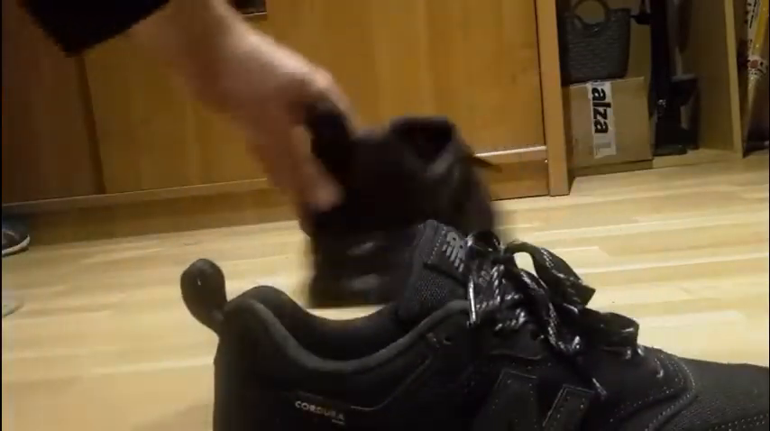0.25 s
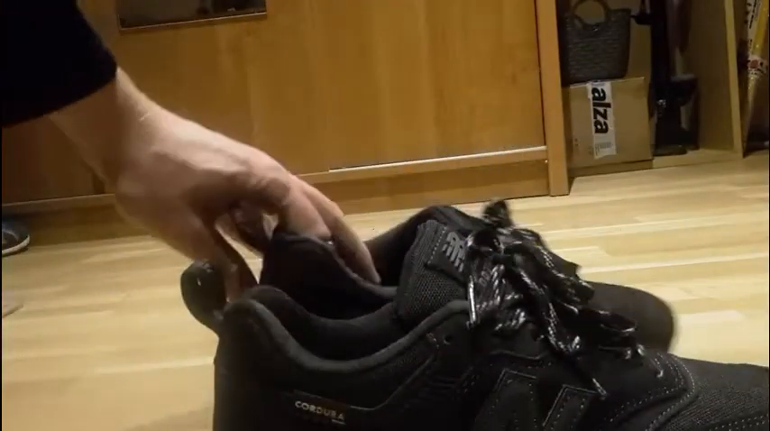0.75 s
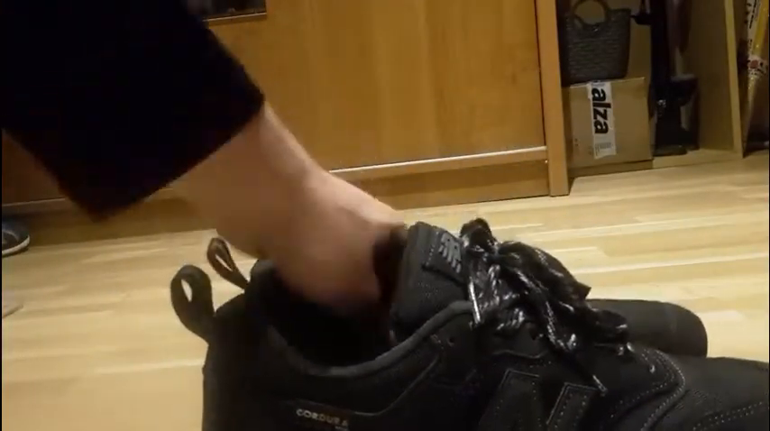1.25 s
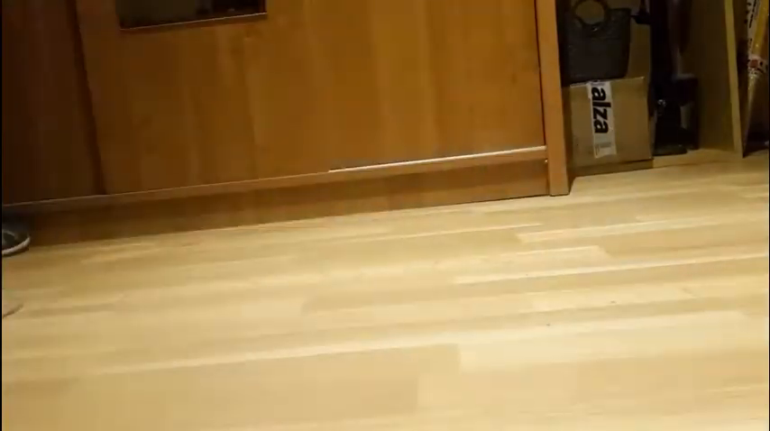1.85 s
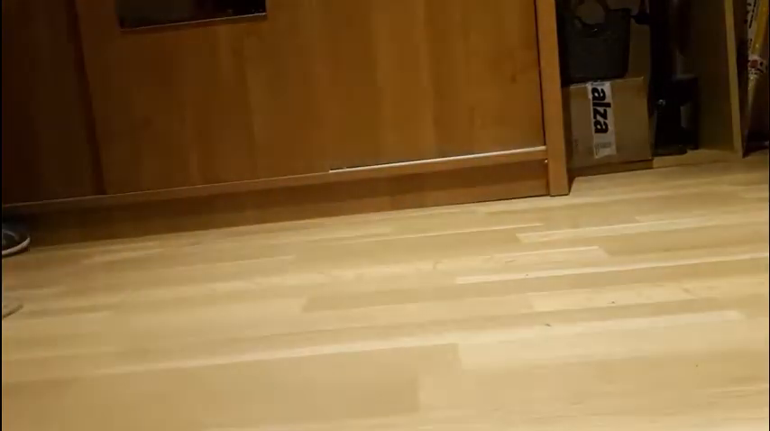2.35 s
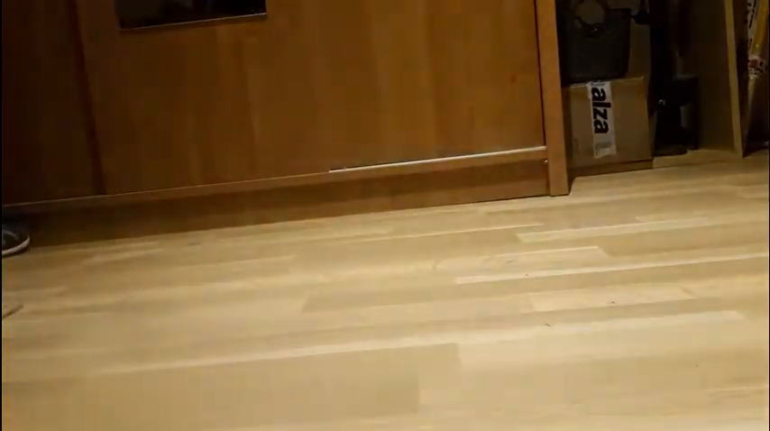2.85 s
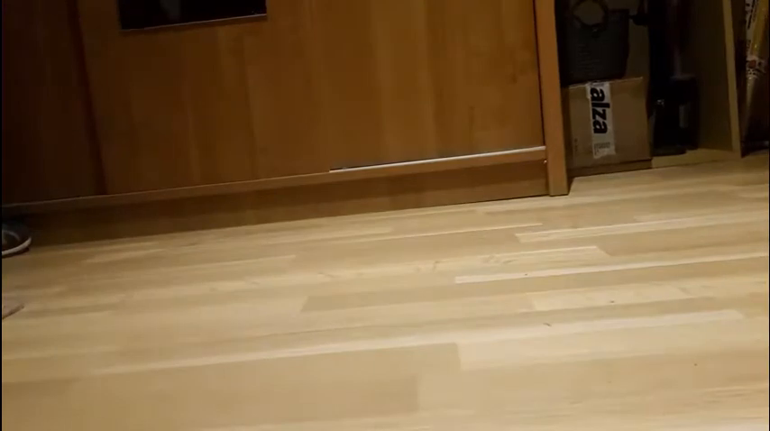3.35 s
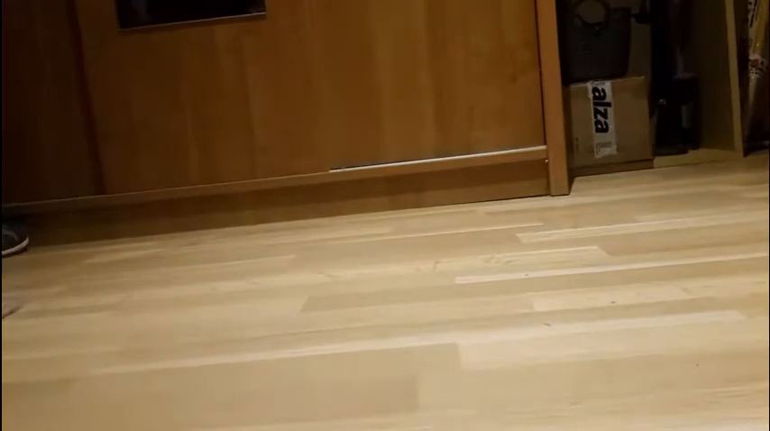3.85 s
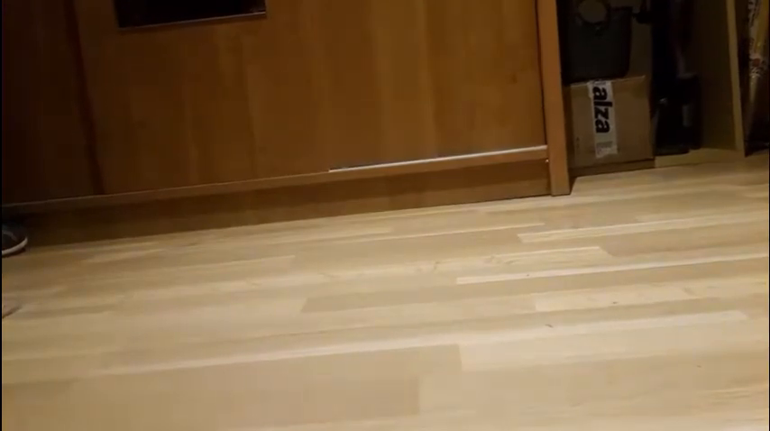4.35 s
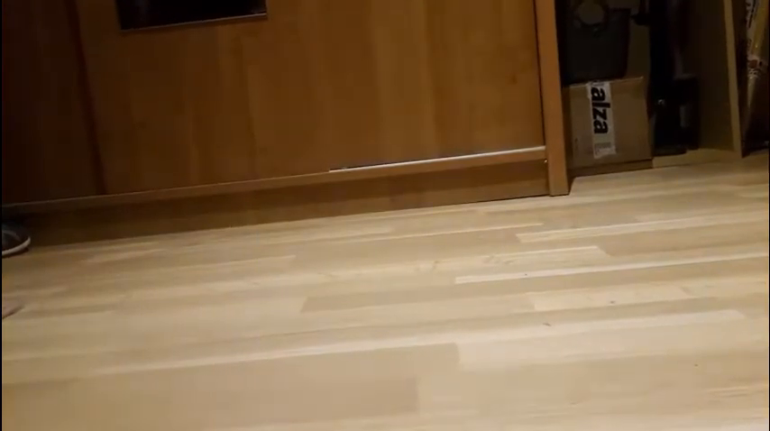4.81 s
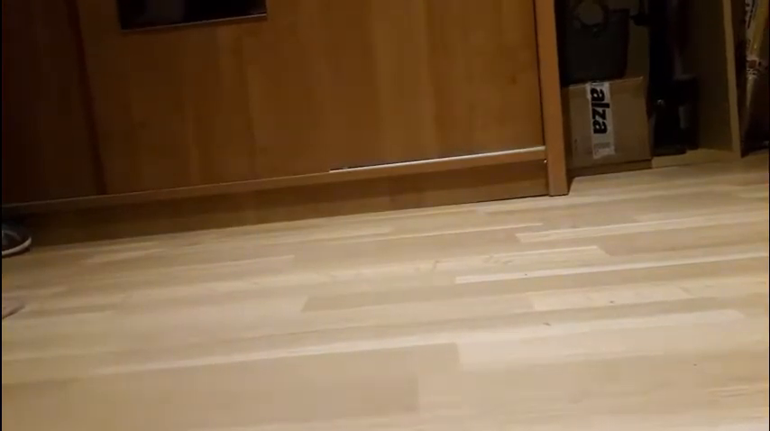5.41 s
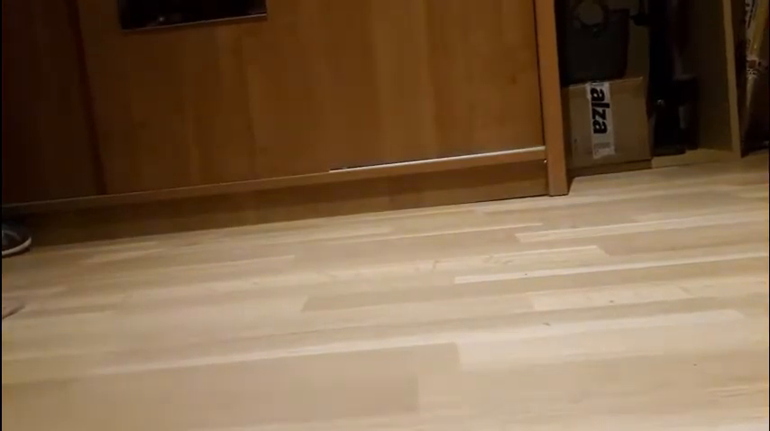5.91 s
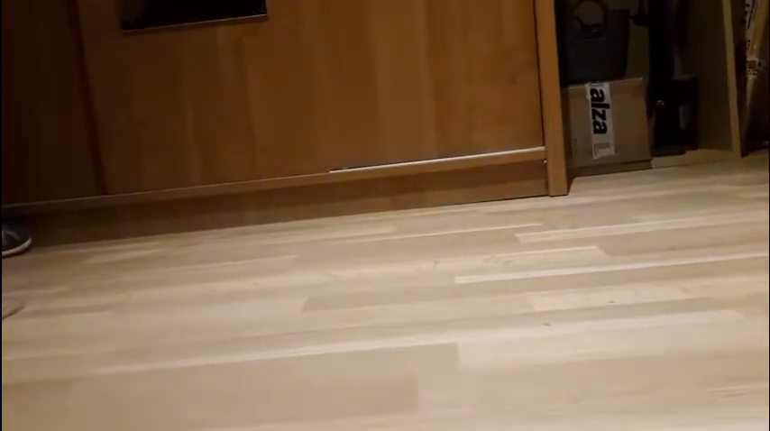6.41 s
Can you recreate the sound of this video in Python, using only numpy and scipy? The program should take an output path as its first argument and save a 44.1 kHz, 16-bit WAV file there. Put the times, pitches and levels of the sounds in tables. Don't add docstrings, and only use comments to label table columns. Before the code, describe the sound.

Close dull shoe thumps on floorboards, a rustling pick-up, then a sharp hollow drop beside a wooden cabinet, fading into small scuffs and hiss.

```python
import sys
import numpy as np
from scipy import signal
from scipy.io import wavfile
from scipy.ndimage import uniform_filter1d

SR = 44100
rng = np.random.default_rng(int(sys.argv[2]) if len(sys.argv) > 2 else 0)


def volts_from_decibels(level):
    exponent = np.asarray(level, float) / 20
    return 10 ** exponent


def dump(signal):
    limited = np.clip(np.atleast_2d(signal).T, -1, 1)
    pcm = np.round(limited * 32767).astype(np.int16)
    wavfile.write(sys.argv[1], SR, pcm)


N = 294191

# t/s, peak
# level/dB, f/Hz, length/cycles, hardness/dB
NEAR_CONTACTS = [(.104, -54, 560, 1.3, -8), (.218, -50.5, 513, 0.71, -7), (.232, -49, 530, 0.77, -12),
                 (.434, -47, 240, 0.5, -20), (.5924, -17.5, 485, 0.47, -2.5), (.657, -27, 470, 0.49, -25),
                 (.755, -42, 368, 0.67, -19), (.900, -51.5, 503, 2.2, -20), (.963, -40.5, 334, 0.22, -21),
                 (1.059, -39.5, 494, 1.8, 9), (1.0732, -20.5, 318, 0.68, -20),
                 (1.0936, -13.5, 498, 1.54, -22), (1.0932, -15.5, 935, 1.57, 1.5),
                 (1.2033, -16, 494, 0.92, -4), (1.252, -32, 460, 0.8, -18), (1.281, -37, 300, 1, -24),
                 (1.31, -45, 296, 0.41, -15), (1.419, -52, 229, 0.48, -15), (1.522, -43, 497, 0.6, -12),
                 (1.595, -47, 486, 0.7, -14), (1.704, -45, 620, 1.04, 5.5), (1.961, -40, 970, 0.61, -38),
                 (2.027, -48.5, 417, 1.2, -8), (1.113, -29, 685, 2.6, -15), (.6395, -36, 806, .6, -15),
                 (.609, -33, 420, 1.1, -17), (.673, -38.5, 410, 1.2, -15), (1.107, -29, 492, 1.1, -20),
                 (1.138, -44, 710, 1.2, -15), (1.119, -37, 950, 1.6, -15), (1.097, -31, 980, 1.3, -11),
                 (1.109, -44, 1000, 0.96, -15), (.62, -44, 890, 1.1, -15), (1.131, -39, 420, 1, -15),
                 (1.148, -34, 400, 1.7, -15), (1.161, -47, 513, 1.3, -15), (1.217, -34, 480, 0.93, -18),
                 (1.243, -35, 300, 1.5, -15),
                 (1.465, -53, 673, 3, -20), (1.485, -50, 676, 3, -20), (1.922, -54, 580, 1.2, -15),
              (1.226, -36, 272, 1.2, -20), (.618, -40, 700, 2.5, -20), (.595, -34, 950, 1.2, -20),
              (.605, -36, 600, 1.2, -20), (.648, -42, 430, 1.1, -20), (.69, -46, 600, 1.5, -20),
              (1.125, -34, 700, 1.5, -20), (1.112, -35, 277, 1.2, -20), (1.268, -38, 426, 1, -20),
              (1.232, -32, 480, 1.2, -20)]
CABINET_CONTACTS = [(2.8066, -4.5, 890, 0.41, -13), (2.8097, -15, 400, 1.27, 2.5),
                    (2.9136, -21.5, 600, 0.18, -2.5), (2.916, -22.5, 400, 0.79, -27),
                    (3.068, -40.5, 400, 1.2, -26), (3.579, -30, 414, 0.65, -2.5),
                    (3.800, -44, 314, 0.61, -17), (3.812, -48, 373, 2.2, -11),
                    (4.3317, -21.5, 710, 0.6, -15.5), (4.3345, -26.5, 560, 1.7, -30),
                    (4.366, -42, 870, 0.83, -10), (4.468, -46, 620, 1.3, -16),
                    (4.617, -34.5, 336, 0.72, -8), (4.634, -41, 380, 0.8, -22), (4.665, -49, 400, 0.6, -16),
                    (4.78, -50, 179, 0.38, -24), (5.494, -46, 402, 1.7, -11), (5.54, -46.5, 423, 0.56, -13),
                    (5.847, -45, 527, 0.35, -16), (5.94, -50, 600, 0.39, -8), (4.98, -51, 450, 0.81, 2),
                    (5.518, -45.5, 427, 0.56, -2), (2.8112, -13, 710, 1, -22), (4.331, -26, 1130, 1.5, -15),
                    (2.823, -28, 770, 1.2, -17), (2.855, -34, 770, 2, -17), (2.9195, -32, 467, 0.53, -21),
                    (2.829, -29, 300, .8, -17), (2.816, -31, 1500, 1.5, -20), (2.838, -26, 1210, 1.3, -20),
                    (2.928, -27, 900, 0.88, -17), (2.843, -31, 274, 1.7, -13), (3.585, -32, 600, 0.71, -18),
                    (4.3295, -44, 600, 0.68, -17), (4.359, -33, 900, 2, -15), (4.383, -38, 710, 2.2, -19),
                    (4.403, -48, 985, 0.91, -15), (4.397, -53, 707, 1.9, -12),
                    (4.321, -45, 700, 1.2, -22), (4.348, -40, 780, 1.8, -18), (4.352, -39, 1370, 1.4, -20),
                 (4.374, -42, 1000, .9, -20), (4.455, -47.5, 410, 1.3, -20), (4.338, -37, 1800, 1.2, -25),
                 (3.582, -44.5, 1110, 3.4, -20), (3.4, -53, 780, 5, -25), (3.878, -56, 790, 4.3, -25),
                 (3.772, -54, 800, 1.2, -20), (2.8092, -19.5, 1100, 1.2, -20), (2.876, -38, 1180, 4.4, -20),
                 (2.945, -42, 190, 1.6, -25), (2.8085, -18.5, 598, 1.9, -25), (2.818, -24, 284, 1.17, -25),
                 (2.862, -35, 540, 2.5, -25), (2.89, -44, 560, 2.5, -25), (2.93, -33, 560, 2, -25),
                 (2.914, -31, 950, 1.5, -25), (2.813, -17, 300, .6, -25), (4.39, -41, 673, 2.5, -22),
                 (4.41, -46, 680, 2.5, -22), (4.645, -46, 790, 1.8, -20)]
# t/s, peak level/dB, f/Hz, length/cycles
NEAR_THUDS = [
    (.596, -39.5, 104, 0.42),
    (1.1, -46, 55, 0.45),
    (1.1, -52, 33, .5),
    (1.098, -38, 133, 0.83),
    (1.208, -34, 146, 0.86),
]
CABINET_THUDS = [
    (2.812, -38, 59.6, 0.51),
    (2.815, -41, 36, .5),
    (3.07, -57, 45, .6),
    (5.5, -62, 70, 0.55),
    (2.811, -30.5, 134, 1.16),
    (3.083, -52.5, 82.4, 1.8),
    (3.581, -41, 86, 1.02),
    (4.621, -46.5, 80, 0.47),
]
# t/s, level/dB
NEAR_JOLTS = [
    (0.219, -49),
    (.963, -40.5),
    (2.028, -52),
]
CABINET_JOLTS = [(2.8068, -13.5), (2.81, -14), (2.913, -27.5), (3.065, -42), (3.594, -30), (3.801, -26.5),
                 (3.8074, -37), (3.8181, -31.5), (3.830, -34), (3.8506, -39.5), (3.66, -42), (3.71, -48),
                 (5.494, -45)]
# t/s, peak level/dB, fade/s, left minus right/dB
CRACKS = [(0.5933, -41, 0.0015, -1), (0.657, -64, 0.0027, -3), (1.0716, -58, 0.0022, -3),
          (1.0943, -34, 0.0015, 2), (1.204, -44, 0.0016, 3), (1.705, -51.5, 0.0019, -7),
          (2.807, -32, 0.0015, 3.5), (2.912, -44, 0.0046, -1), (3.58, -43.5, 0.0038, -2),
          (4.329, -43.5, 0.0023, 7), (4.6155, -53.5, 0.0022, -17.5)]
# peak t/s, drag level/dB, rise/s, fall/s, grit over drag/dB
SLIDES = [(.67, -46, 0.086, 0.43, -12.5), (.91, -48, 0.1, .3, -16), (1.08, -40, 0.093, 0.016, -12.5),
          (1.17, -56, .2, .2, -2), (1.28, -39.5, 0.25, 0.15, -10), (1.5, -45.5, 0.22, 0.17, -10),
          (1.97, -43, 0.091, 0.11, -9), (2.19, -48, 0.06, 0.082, -11.5), (2.3, -48.5, 0.03, 0.17, -12),
          (2.85, -56, 0.039, 0.23, 9), (2.95, -46.5, 0.073, 0.35, -8), (3.1, -45.5, 0.55, 0.18, -12),
          (3.35, -52.5, 0.082, 0.74, -8.5), (3.61, -42, 0.04, 0.26, -10.5), (3.7, -58, .3, .13, -7),
          (3.83, -45, 0.089, 0.15, -8.5), (4.38, -39.5, 0.12, 0.14, -27), (4.45, -50, .2, 0.17, -5),
          (4.71, -49, 0.43, 0.24, -9.5), (5.2, -55.5, 0.55, 0.28, -6), (5.55, -58, 0.098, 0.22, 2),
          (5.84, -48.5, 0.22, 0.5, -12), (6.3, -49, 0.17, 0.12, -15), (6.38, -51.5, 0.16, 0.95, -11)]
# peak t/s, level/dB, rise/s, fall/s
SQUEALS = [
    (1.22, -55, .03, 0.12),
    (1.25, -53, 0.068, 0.04),
    (1.295, -57, .03, 0.04),
]
# peak t/s, swish level/dB, rise/s, fall/s, microphone port whistle over swish/dB
BRUSHES = [(.3, -71, .4, 0.29, -8), (.6, -80, .03, .1, -4), (.67, -69, .1, .3, -8), (.9, -65, .06, 0.11, 1),
           (1.09, -58, 0.12, 0.11, 2), (1.215, -53, 0.082, 0.13, -1), (1.25, -59, .1, 0.11, -1),
           (1.5, -72, 0.11, .15, 5), (1.97, -71, .1, .2, -3), (2.278, -36.5, .03, 0.034, -19),
           (2.3, -61, 0.0092, 0.14, -3), (2.82, -44, 0.018, 0.48, -16), (2.95, -41, 0.054, 0.097, -20),
           (3.0, -85, .1, 0.11, -17), (3.345, -60, 0.0065, 0.033, 3), (3.59, -34.5, .015, 0.056, -29),
           (3.61, -43, 0.027, 0.14, -16), (3.83, -69, .1, .2, -4), (4.41, -41, .12, 0.18, -27),
           (4.68, -44, 0.11, 0.044, -19), (5.2, -54, 0.26, 0.15, -15), (5.55, -41, 0.059, 0.097, -16),
           (5.89, -45.5, 0.14, 0.23, -19), (6.33, -62, 0.23, 0.11, -10)]
# t/s, peak level/dB, f/Hz, left minus right/dB
TICKS = [(.5935, -44, 2450, -4), (.594, -44, 3500, -4), (1.0945, -38, 2800, -2), (1.205, -44, 1700, -1),
         (1.501, -48, 5900, -6.5), (1.5313, -46, 5200, -3), (1.9392, -42.5, 3160, -4.0),
         (1.962, -50, 3060, -10), (2.2255, -50, 5330, -22), (2.2664, -40.5, 4040, -4),
         (2.2731, -36.5, 5430, -15.5), (2.5594, -58, 2980, -4.5), (2.5596, -55, 9000, -4),
         (1.985, -47, 3000, -6), (3.3428, -37.5, 5650, -14), (3.3584, -63, 5840, -6.5),
         (3.477, -49.5, 5160, -15), (5.3994, -56, 3010, -8), (6.2307, -51, 3300, -7),
         (6.3215, -46.5, 5500, -16), (6.3505, -39.5, 5770, -11), (6.352, -46, 4600, -9)]
# f/Hz, level/dB, time to fall 60 dB/s
NEAR_BOARDS = [(245, 9, 0.018), (353, -4.5, 0.15), (403, -7, 0.096), (600, -26, 0.045), (710, -10, 0.067),
               (922, -3.5, 0.026), (1044, -17, 0.044)]
CABINET_BOARDS = [(248, 8.5, 0.094), (400, -1, 0.091), (560, 10, 0.3), (608, 5.5, 0.073), (770, 5.5, 0.08),
                  (892, 9, 0.11), (1181, 9, 0.052), (1467, -16, 0.068)]
# f/Hz, level/dB, time to fall 60 dB/s
PANEL = [(174.5, -6, 0.23), (385.5, -12, 0.17), (187.3, -18, .15), (127, -20, 0.057), (206, -24, 0.091)]
# f/Hz, level/dB, time to fall 60 dB/s, left-right likeness (0 to 1)
ROOM = [(80, 8.5, 0.14, 0.35), (229, 0.5, 0.22, 0.13), (400, -1.5, 0.32, 0.68), (670, -2.5, 0.36, 0.8),
        (1340, 2, 0.35, 0.033), (4370, 4, 0.34, 0.34), (12000, -51, 0.19, .1)]
# f/Hz, level per Hz/dB
HISS = [(15, -29), (25, -18), (49, -20), (92, 2), (206, -4.5), (270, -7.5), (394, 2), (439, -4.5),
        (560, 4.5), (754, -3.5), (2280, -12.5), (8140, -24.5), (11300, -14), (14800, -5.5), (16000, -27)]
# f/Hz, left minus right/dB
HISS_BALANCE = [(60, 1), (110, -7), (200, -22.5), (380, -11), (700, -8.5), (1290, -14), (2380, -20.5),
                (4400, -19.5), (8120, -8.5), (15000, -6)]
# f/Hz, level/dB
OPENING = [(45, 12), (110, 21), (1000, 3), (3000, -19), (10000, 8.5)]


def contacts(events, thuds, jolts, boards, boards_db, boom_db):
    t = np.arange(SR // 15) / SR
    pulses, pushes = np.zeros((2, N))
    struck, modes_hz = np.zeros((len(boards), N)), np.array(boards)[:, 0]
    luck_db = 2.5 * np.tile(rng.standard_normal((40, len(boards))), (2, 1))
    thud_hardness_db = -30
    touches = events + [(*row, thud_hardness_db) for row in thuds]
    for k, (s, peak_db, hz, cycles, hard_db) in enumerate(touches):
        start = round(s * SR)
        age = t * hz / max(cycles, .2)
        swell = (age * np.exp(1 - age)) ** 0.94
        pulse = -volts_from_decibels(peak_db) * np.sin(2 * np.pi * hz * t) * swell
        pulses[start:start + len(t)] += signal.lfilter(*signal.butter(2, hz / 5.0, "high", fs=SR), pulse)
        reach_db = hard_db * (modes_hz > 500) + 7 * np.minimum(np.log2(modes_hz / hz), 0)
        struck[:, start + 30] += volts_from_decibels(peak_db + reach_db + luck_db[k])

    carried = [(row[0], row[1] + boom_db) for row in events]
    for s, push_db in carried + jolts:
        start = round(s * SR)
        pushes[start:start + len(t)] -= volts_from_decibels(push_db) * np.exp(-t / 0.00077) / (0.00089 * SR)

    rung = 0
    for x, (hz, level_db, t60) in zip(struck, boards):
        rung = rung + volts_from_decibels(level_db + boards_db) * ring(x, hz, min(t60, .065))
    rung = signal.sosfilt(signal.butter(3, 1200, fs=SR, output="sos"), rung)
    rung = signal.lfilter(*signal.butter(2, 130, "high", fs=SR), rung)
    boom = sum(volts_from_decibels(level_db) * ring(pushes, hz, t60) for hz, level_db, t60 in PANEL)
    return pulses + rung, signal.lfilter(*signal.butter(2, 90, "high", fs=SR), boom)


def cracks():
    out, t = np.zeros((2, N)), np.arange(SR // 20) / SR
    grit = rng.standard_normal((len(CRACKS), 2, len(t)))
    shared = .8
    grit[:, 1] = shared * grit[:, 0] + np.sqrt(1 - shared ** 2) * grit[:, 1]
    grit[:, :, 0] = 5
    for k, (s, peak_db, fade_s, pan_db) in enumerate(CRACKS):
        start = round(s * SR)
        level = volts_from_decibels(peak_db + pan_db * np.array([[.5], [-.5]]))
        out[:, start:start + len(t)] += level * grit[k] * np.exp(-t / fade_s)
    by_cabinet = np.arange(N) > 2.5 * SR
    out[1] = np.where(by_cabinet, np.roll(out[1], round(.0003 * SR)), out[1])
    dulled = signal.lfilter([.4], [1, -.75], out) + 0.012 * out
    bright = .5 * dulled + resonance(dulled, hz=3260, width=2600) + .45 * resonance(dulled, hz=4900, width=1000)
    return signal.sosfilt(signal.butter(2, 1300, "high", fs=SR, output="sos"), bright)


def scuffing():
    # rise held to the shortest, 0.003 s, fall 0.02 s, 6 dB below its crack
    sprays = [(s, peak_db, 0.0026, 0.02, -6) for s, peak_db, *_ in CRACKS]
    drag_db = strokes(SLIDES, rest_db=-61.5)
    grit_db = strokes(SLIDES + sprays, rest_db=-69, extra_db=[row[-1] for row in SLIDES + sprays])
    swish_db = strokes(BRUSHES, rest_db=-85.5)
    whistle_db = strokes(BRUSHES, rest_db=-137, extra_db=[row[-1] for row in BRUSHES])
    squeal_db = strokes(SQUEALS, rest_db=-120)

    sizes = volts_from_decibels(3.55 * np.minimum(rng.exponential(1, N), 4.5)) * rng.choice([-1, 1], N)
    slips = sizes * (rng.random(N) < 900 / SR)
    dealt = rng.integers(0, 12, N)
    pitches_hz = np.geomspace(240, 1150, 12)
    drag = sum(ring(slips * (dealt == k), hz, 4.3 / hz) for k, hz in enumerate(pitches_hz))
    drag = volts_from_decibels(drag_db - 14.5) * rms_one(drag)

    shared = rng.standard_normal((3, N))
    common = np.stack([shared, np.roll(shared, 16, axis=1)], axis=1)
    grit_noise, port_noise, cloth_noise = rng.standard_normal((3, 2, N)) + 0.32 * common
    grains = rms_one(np.array([slips, np.roll(slips, 16)]))

    grit = rms_one(resonance(grit_noise + 0.72 * grains, hz=2280, width=2270))
    grit = volts_from_decibels(grit_db - 3.0 + drift(16)) * grit
    whistle = resonance(port_noise + .5 * grains[:, ::-1], hz=5750, width=1100)
    whistle = rms_one(resonance(whistle, hz=5750, width=1100))
    whistle = volts_from_decibels(whistle_db - 1 + 1.5 * drift(40)) * whistle
    high_squeal = resonance(resonance(port_noise, hz=3960, width=120), hz=3970, width=200)
    low_squeal = resonance(resonance(grit_noise, hz=1400, width=250), hz=1400, width=300)
    squeal = volts_from_decibels(squeal_db) * rms_one(high_squeal + 0.96 * low_squeal)
    swish = rms_one(resonance(cloth_noise, hz=10300, width=22000))
    swish = volts_from_decibels(swish_db - 14.5 + 1.0 * drift(40)) * swish

    fine = (grit + whistle + squeal) * volts_from_decibels(np.array([[-2.5], [2.5]]))
    return drag, fine + swish * volts_from_decibels(np.array([[1.5], [-1.5]]))


def ticks():
    out, t = np.zeros((2, N)), np.arange(SR // 50) / SR
    grit = rng.standard_normal((len(TICKS), len(t)))
    for k, (s, peak_db, hz, pan_db) in enumerate(TICKS):
        start = round(s * SR)
        tick = (np.sin(2 * np.pi * hz * t) + .35 * grit[k]) * np.exp(-t / .0008)
        out[:, start:start + len(t)] += volts_from_decibels(peak_db + pan_db * np.array([[.5], [-.5]])) * tick
    return out


def room(x, first_s, early_db, lasting=1):
    t, tail = np.arange(SR // 2) / SR, 0
    for hz, (mid, side) in half_octaves(len(t)):
        alike = np.clip(at_hz(ROOM, hz, column=3), 0, 1)
        fade = volts_from_decibels(at_hz(ROOM, hz) - 60 * t / at_hz(ROOM, hz, column=2) / lasting)
        tail = tail + fade * (np.sqrt(1 + alike) * mid + np.sqrt(1 - alike) * side * [[1], [-1]])
    tail = tail * np.clip(t / first_s - 1, 0, 1) * volts_from_decibels(early_db * np.exp(-t / 0.0048))
    return signal.fftconvolve(x[None], tail, axes=1)[:, :N]


def hiss(opening):
    out = 0
    for hz, noise in half_octaves(N):
        half_db = at_hz(HISS_BALANCE, hz) / 2
        left_db = half_db + at_hz(OPENING, hz) * opening + 2.3 * drift(16)
        right_db = 0.44 * drift(2.3) - half_db
        out = out + volts_from_decibels(at_hz(HISS, hz)) * noise * volts_from_decibels(np.array([left_db, right_db]))
    return out / np.sqrt(np.mean(out[1] ** 2))


def ring(x, hz, t60):
    r, w = volts_from_decibels(-60 / (t60 * SR)), 2 * np.pi * hz / SR
    return signal.lfilter([0, np.sin(w)], [1, -2 * r * np.cos(w), r * r], x + 1e-18)


def resonance(x, hz, width):
    return signal.lfilter(*signal.iirpeak(hz, hz / width, SR), x)


def strokes(rows, rest_db, extra_db=0):
    t, power = np.arange(0, N + 40, 40) / SR, volts_from_decibels(2 * rest_db)
    for (s, peak_db, rise_s, fall_s, *_), add_db in zip(rows, np.broadcast_to(extra_db, len(rows))):
        away = np.where(t < s, (s - t) / max(rise_s, .003), (t - s) / max(fall_s, .003))
        power = power + volts_from_decibels(2 * (peak_db + add_db - 20 * np.minimum(away, 8)))
    return np.interp(np.arange(N) / SR, t, 10 * np.log10(power))


def drift(rate):
    r = np.exp(-80 * np.pi * rate / SR)
    slow = signal.lfilter([1], [1, -2 * r, r * r], rng.standard_normal(N // 40 + 2002))[2000:]
    return np.interp(np.arange(N) / 40, np.arange(len(slow)), rms_one(slow))


def half_octaves(size):
    edges = 25 * 2 ** np.arange(0, 9.6, .5)
    white = rng.standard_normal((2, 2, size))
    for k, (low, high) in enumerate(zip(edges, edges[1:])):
        band = signal.butter(2, [low, high], "band", fs=SR, output="sos")
        yield np.sqrt(low * high), signal.sosfilt(band, white[k % 2])


def at_hz(points, hz, column=1):
    points = np.array(points)
    return np.interp(np.log(hz), np.log(points[:, 0]), points[:, column])


def rms_one(x):
    return x / np.sqrt(np.mean(x ** 2) + 1e-20)


def placed(x, lag_s, pan_db):
    lag = round(lag_s * SR)
    left = np.roll(x, max(lag, 0)) * volts_from_decibels(pan_db / 2)
    right = np.roll(x, max(-lag, 0)) * volts_from_decibels(-pan_db / 2)
    return np.array([left, right])


def scene():
    drag, fine = scuffing()
    hit, boom = contacts(NEAR_CONTACTS, NEAR_THUDS, NEAR_JOLTS, NEAR_BOARDS,
                         boards_db=-8.5, boom_db=-13.5)
    near = placed(hit, lag_s=0.00022, pan_db=2.0) + placed(boom, lag_s=0, pan_db=6.5)
    near += volts_from_decibels(-38.0) * room(hit + 1.67 * drag, first_s=0.00138, early_db=26.5, lasting=0.8)

    hit, boom = contacts(CABINET_CONTACTS, CABINET_THUDS, CABINET_JOLTS, CABINET_BOARDS,
                         boards_db=-17.0, boom_db=-36)
    far = placed(hit, lag_s=-0.00028, pan_db=1.5) + placed(boom, lag_s=0, pan_db=8.0)
    far += volts_from_decibels(-38.0) * room(hit, first_s=0.0037, early_db=25.0, lasting=0.85)

    tick, crack = ticks(), cracks()
    echo = volts_from_decibels(-39.5) * room(tick[1], first_s=0.0029, early_db=22)
    echo += volts_from_decibels(-30) * room(crack[1], first_s=0.0061, early_db=-33.0)
    return near + far + placed(drag, lag_s=0.000089, pan_db=-7.5) + fine + tick + crack + echo


def low_pass(x):
    return signal.sosfilt(signal.butter(12, 16390, fs=SR, output="sos"), x)


def record(dry):
    level_db = 10 * np.log10(uniform_filter1d(dry[0] ** 2, size=400) + 1e-12)
    slope = 90 * np.arange(N) / SR
    held_db = np.maximum.accumulate(level_db + slope) - slope
    opening = np.clip((held_db + 46.0) / 22, 0, 1)
    noise = volts_from_decibels(-56 + 3) * hiss(opening)

    coming_db = np.roll(level_db, -240)
    sudden = coming_db - level_db > 29
    duck = uniform_filter1d(np.clip((coming_db + 36) / 8, 0, 1) * sudden, size=60)
    mix = (dry + noise) * volts_from_decibels(-26 * duck)
    mix = signal.sosfilt(signal.cheby2(18, 50, 15720, fs=SR, output="sos"), mix)
    mix = signal.sosfilt(signal.butter(2, 30, "high", fs=SR, output="sos"), mix)
    return low_pass(mix)


dry = scene()
out = record(dry)
dump(out)
```